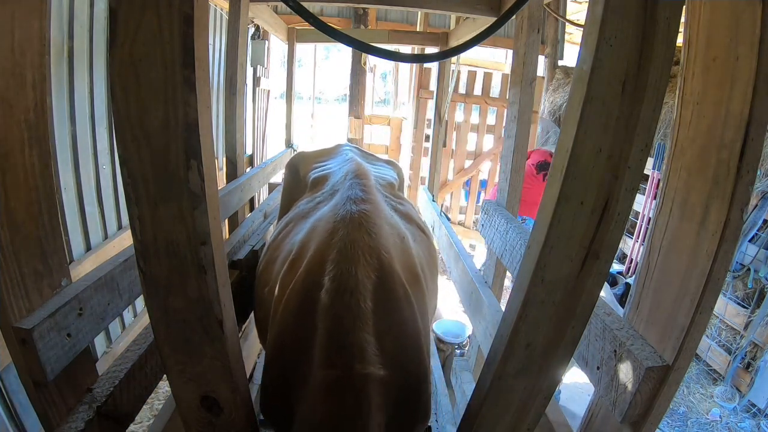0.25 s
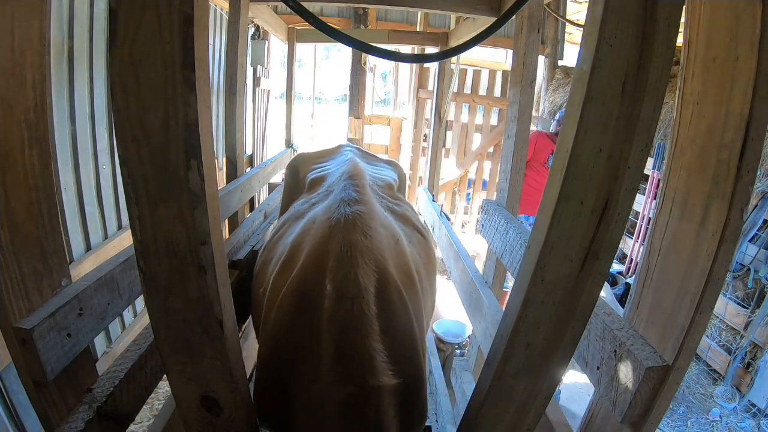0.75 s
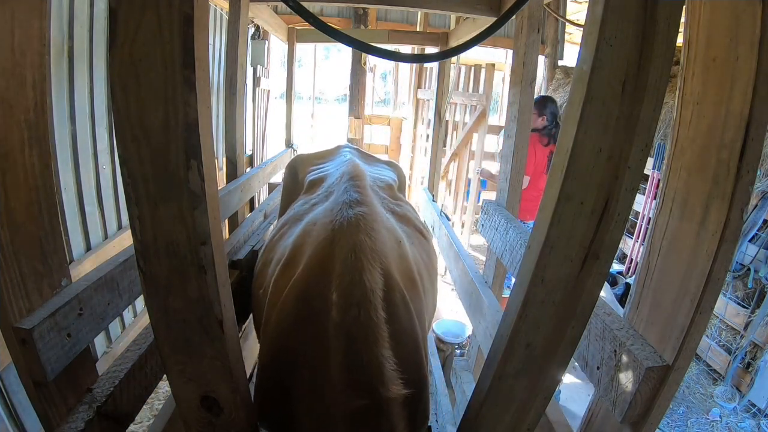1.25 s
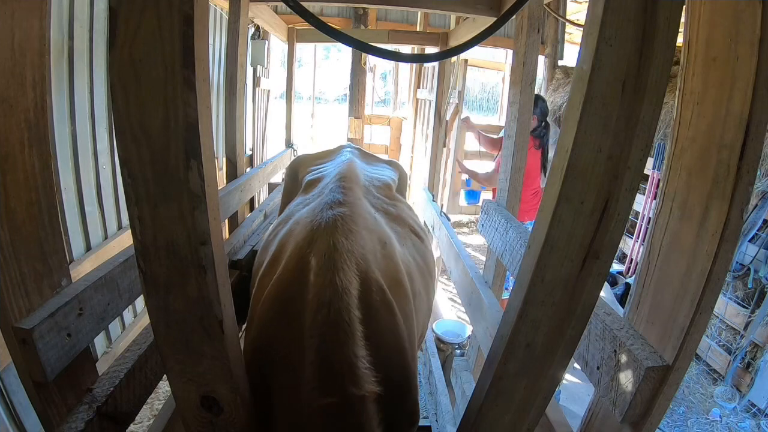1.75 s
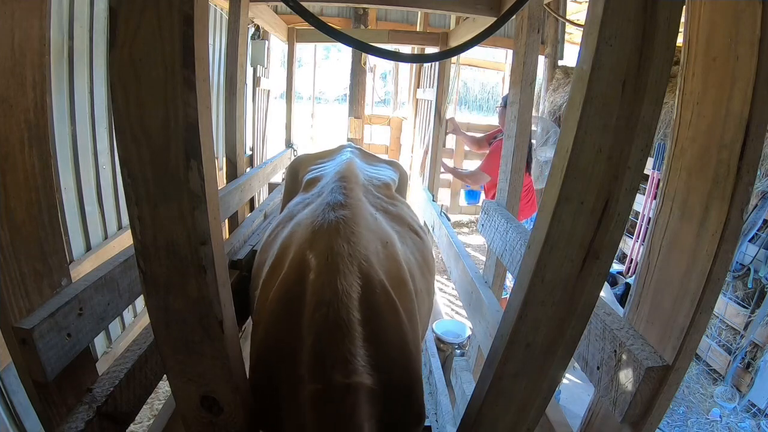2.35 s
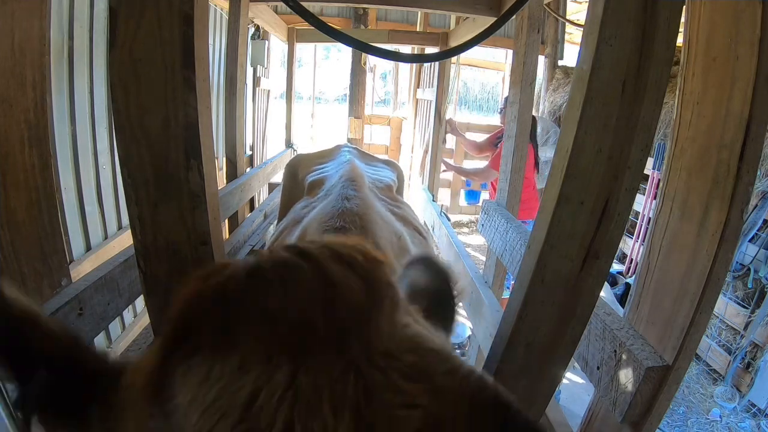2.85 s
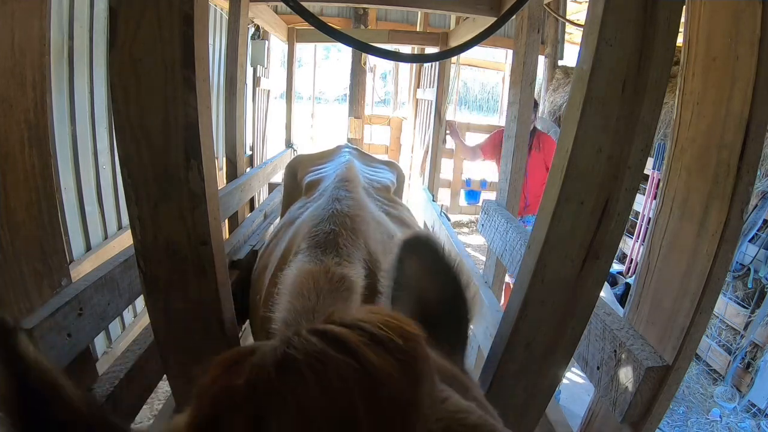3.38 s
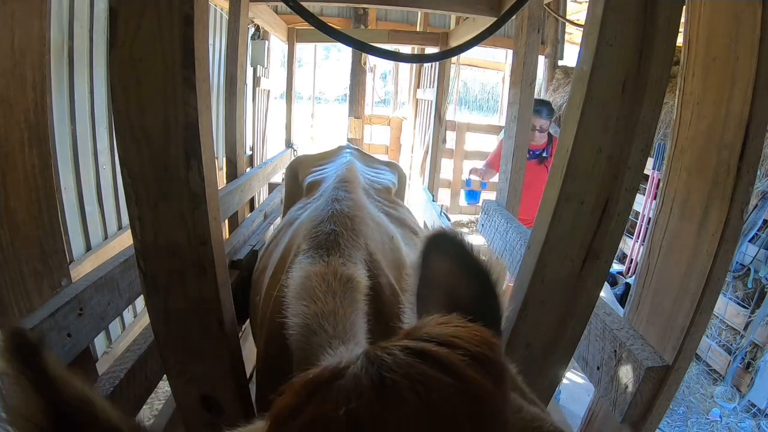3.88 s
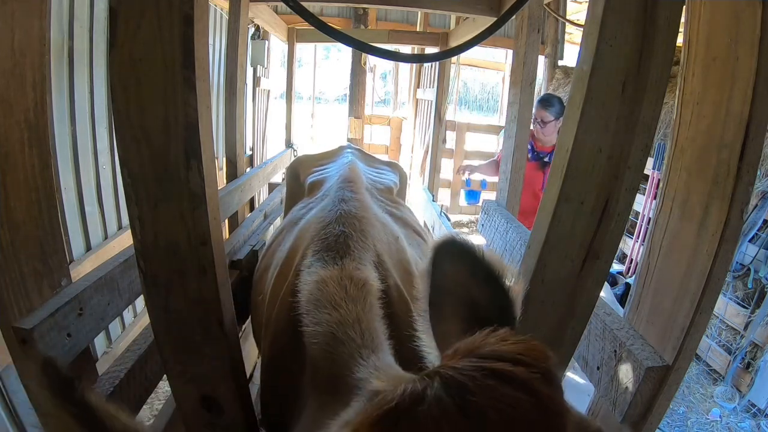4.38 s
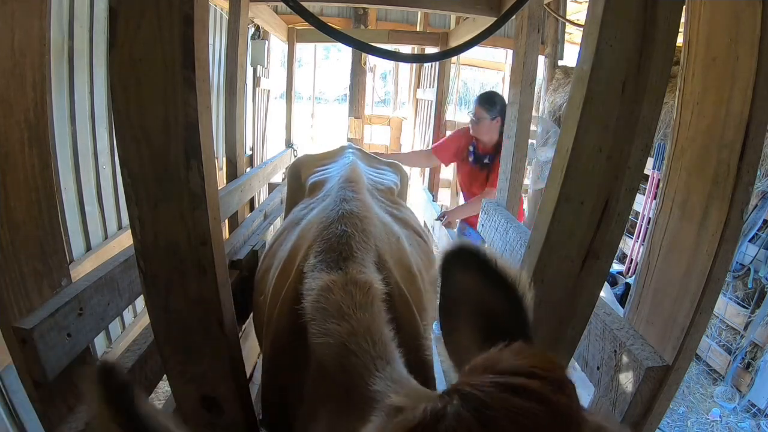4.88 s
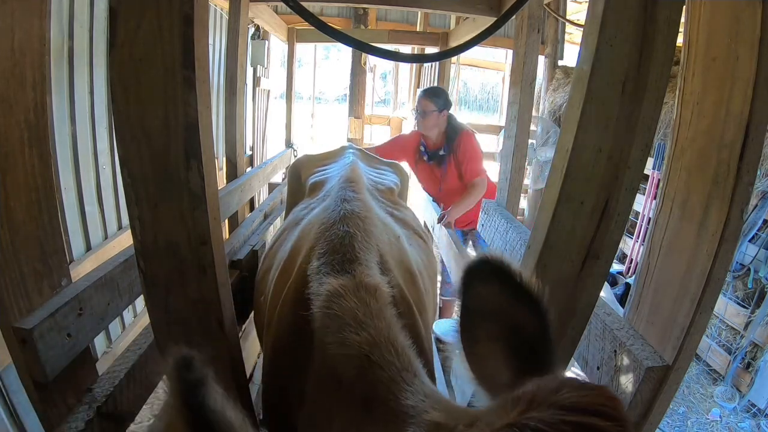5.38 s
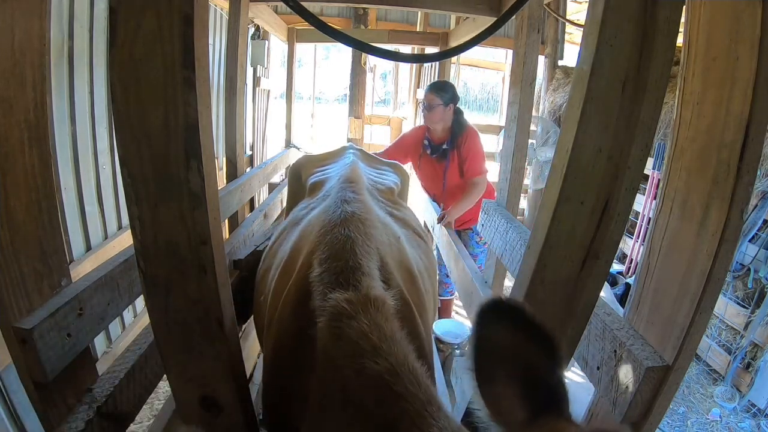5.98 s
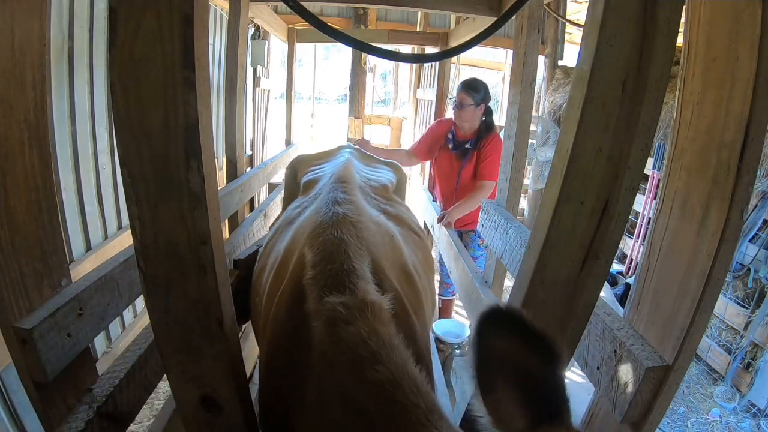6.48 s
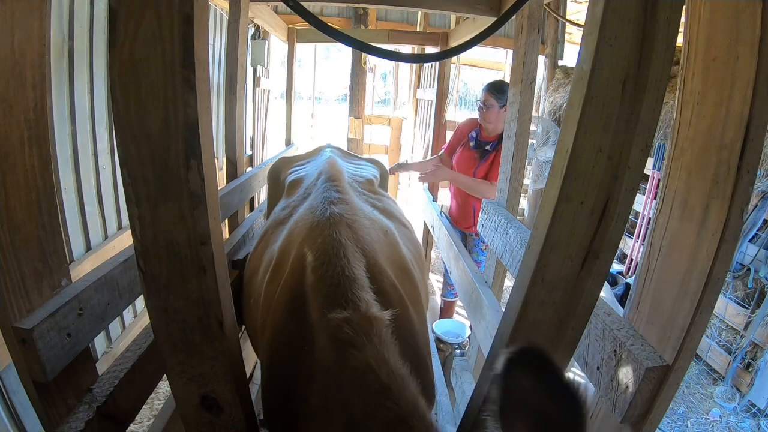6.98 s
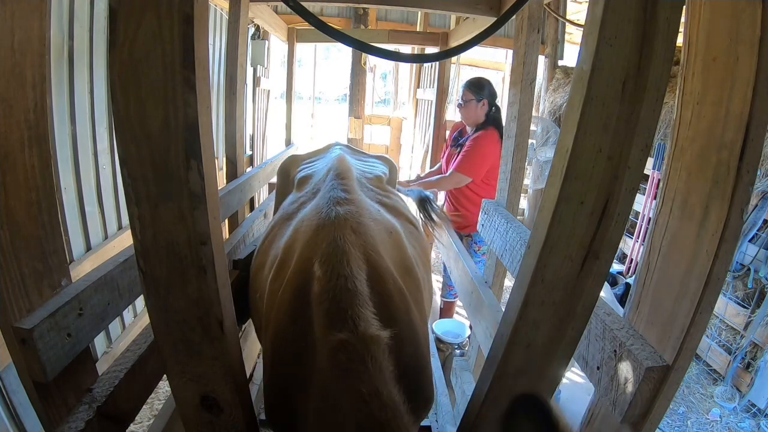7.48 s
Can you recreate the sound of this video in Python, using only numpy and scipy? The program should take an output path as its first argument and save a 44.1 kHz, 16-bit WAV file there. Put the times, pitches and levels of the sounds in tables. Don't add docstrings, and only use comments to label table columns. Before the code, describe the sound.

Stereo microphone fixed to the stall timber, so blows come through solid and bassy with a short bright scatter from open slats. First gate bang and latch, then soft hoof thuds and a quieter gap, then dry, sharp crunching and straw rustle up close. Later a heavy double hoof thump, a wooden bar stuttering through its slot, high chain jingles, a brief strap creak and a tap on the trough.

```python
import sys
import numpy as np
from scipy import signal
from scipy.fft import rfft, irfft
from scipy.io import wavfile
from scipy.ndimage import uniform_filter1d

SR = 44100
rng = np.random.default_rng(int(sys.argv[2]) if len(sys.argv) > 2 else 0)


def voltage_ratio(decibels):
    exponent = np.asarray(decibels, float) / 20
    return 10 ** exponent


def generate_wav(sig):
    pcm = np.round(np.clip(np.atleast_2d(sig).T, -1, 1) * 32767).astype(np.int16)
    wavfile.write(sys.argv[1], SR, pcm)


N = 341327
HIT = SR // 4

# pitch_hz, width_hz, level_db
BOARDS = [(107, 65, -13), (135, 40.8, 0), (155.5, 51.7, -1), (212.2, 47.7, -2), (268, 156, -7.5),
          (395, 310, -11.5)]
# pitch_hz, level_db, t60_s
POST_BODY = [(204.2, 10.5, 0.31), (416.7, 6.5, 0.19), (272, 5, 0.13)]
# freq_hz, level_db_per_hz
POST_GRAIN = [(180, -97), (300, -21), (414, -2.5), (660, -15.5), (1020, -3.5), (1400, -6), (3460, -17.5),
              (8780, -35.5), (14000, -61)]


def level(x, db):
    return x * voltage_ratio(db) / np.sqrt(np.mean(x ** 2))


def curves(table):
    s, *columns = np.transpose(table)
    return [np.interp(np.arange(N) / SR, s, c) for c in columns]


def band(x, lo_hz, hi_hz):
    edges_hz = [lo_hz, min(hi_hz, .45 * SR)]
    return signal.sosfilt(signal.butter(2, edges_hz, "band", fs=SR, output="sos"), x)


def ring(x, hz, t60):
    r = np.exp(-np.log(1000) / (t60 * SR))
    w = 2 * np.pi * hz / SR
    return signal.lfilter([np.sin(w)], [1, -2 * r * np.cos(w), r * r], x)


def resonances(x, peaks):
    out = 0
    for k, (hz, width_hz, db) in enumerate(peaks):
        t60 = np.log(1000) / (np.pi * width_hz)
        out = out + (-1) ** k * voltage_ratio(db) * width_hz * ring(x, hz, t60)
    return out


def colour(x, points):
    hz, db = np.transpose(points)
    log_hz = np.log(np.arange(1025) * SR / 2048 + 1)
    cep = irfft(np.interp(log_hz, np.log(hz), db) * np.log(10) / 20)
    cep[1:1024] = 2 * cep[1:1024]
    cep[1025:] = 0
    return signal.oaconvolve(x, irfft(np.exp(rfft(cep))))[:len(x)]


def grains(per_s, spread_db, size=N):
    hit, strength, sign = rng.random((3, size))
    return (hit < per_s / SR) * voltage_ratio(-spread_db * np.log(strength + .02)) * np.sign(sign - .5)


def walk(rate_hz):
    k = int(SR / rate_hz)
    steps = np.repeat(rng.standard_normal(N // k + 1), k)
    return 1.65 * uniform_filter1d(uniform_filter1d(steps, k), k)[:N]


def burst(t60, rise_s=0.00085, size=SR // 2):
    t = np.arange(size) / SR
    return rng.standard_normal(size) * (1 - np.exp(-t / rise_s)) * np.exp(-np.log(1000) * t / max(t60, .01))


def push(width_s):
    shove = np.hanning(int(width_s * SR) + 3)
    return np.pad(shove, (0, SR // 2 - len(shove)))


def spread(make, apart):
    return level(make() + apart * make() * np.array([[1], [-1]]), 0)


def add(out, s, wave, db, pan_db=0.):
    i = int(s * SR)
    wave = wave[..., :N - i]
    sides_db = np.array([[pan_db], [-pan_db]]) / 2
    out[:, i:i + wave.shape[-1]] += wave / np.abs(wave).max() * voltage_ratio(db + sides_db)


def gestures(table, rise_db_s, fall_db_s, rest_db):
    s, hold, *columns = np.transpose(table)[:, :, None]
    t = np.arange(0, N, 64) / SR
    shape_db = -rise_db_s * np.maximum(s - t, 0) - fall_db_s * np.maximum(t - s - hold, 0)
    out = []
    for c, rest in zip(columns, rest_db):
        db = np.maximum((c + shape_db).max(axis=0), rest)
        out.append(np.interp(np.arange(N) / SR, t, db))
    return out


def knocks(events, body, clack, grain, swell_s, strike_t60, contact_t60, grain_db, pan_db,
           rise_s=0.00097, twin=0.7):
    out = np.zeros((2, N))
    swell = 1 - np.exp(-np.arange(SR // 2) / SR / swell_s)
    for s, db, clack_db in events:
        low = sum(voltage_ratio(g) * ring(push(0.0012), hz, t60) for hz, g, t60 in body)
        add(out, s, band(swell * low, 150, 1200), db, pan_db)
        modes = 0
        for hz, g, t60 in clack:
            mode = ring(burst(strike_t60, rise_s), hz, t60)
            mode = mode + twin * ring(burst(strike_t60, rise_s), 1.04 * hz, t60)
            modes = modes + voltage_ratio(g) * level(mode, 0) * np.sqrt(t60)
        crushed = colour(burst(contact_t60, rise_s), grain)
        add(out, s, level(modes, 0) + level(crushed, grain_db), clack_db, pan_db)
    return out


def cracks(events):
    out = np.zeros((2, N))
    for s, db, hz, bright_db, t60 in events:
        crumble = voltage_ratio(25.0 * uniform_filter1d(rng.standard_normal(HIT), size=60))
        crunch = spread(lambda: burst(t60, rise_s=0.001, size=HIT), apart=0.71) * crumble
        contact = crunch / np.abs(crunch).max() + 0.45 * burst(.008, rise_s=0.00055, size=HIT)
        broad = band(band(contact, .55 * hz, 1.4 * hz), .4 * hz, 1.6 * hz)
        add(out, s, broad + .045 * ring(contact, hz, .007), db, -2.7)
        add(out, s, band(band(contact, 4600, 10000), 2000, 11500), bright_db, -2.1)
    return out


def air():
    # freq_hz, level_db_per_hz
    air_spectrum = [(18, -63), (30, -32.5), (181, 3), (373, -9), (458, -14.5), (1220, -19.5), (1880, -20.5),
                    (3230, -21.5), (8810, -43), (14000, -100)]
    mid, side = (band(colour(rng.standard_normal(N), air_spectrum), 45, 16000) for _ in range(2))
    return level(mid + 0.34 * side * np.array([[1], [-1]]), -52)


def insects():
    # pitch_hz, width_hz, level_db
    wing_bands = [(2500, 400, -2), (4670, 250, 1), (6800, 400, -2.5)]
    swell = np.exp(-((np.arange(N) / SR - 1.25) / 0.62) ** 2)
    return swell * level(resonances(rng.standard_normal((2, N)), wing_bands), -63.5)


def bird():
    # time_s, pitch_hz, level_db
    peep = [(1.155, 6730, -64), (1.17, 7500, -59), (1.19, 7900, -60), (1.215, 8160, -73),
            (1.235, 8300, -74)]
    hz, db = curves(peep)
    inside = np.abs(np.arange(N) / SR - 1.195) < .04
    level_now = voltage_ratio(db + 3.0 * walk(150))
    return inside * level_now * np.sin(2 * np.pi * np.cumsum(hz * (1 + .02 * walk(400))) / SR)


def shifting():
    # start_s, hold_s, sway_db, rub_db
    shifts = [(0.0, 0.013, -49, -37.5), (0.36, 0.21, -52, -40), (0.8, 0.2, -66, -41.5),
              (1.36, 0.36, -42, -42), (1.8, 0.43, -53, -45), (2.15, 0.21, -39.5, -44),
              (2.4, 0.18, -37.5, -51), (2.8, 0.14, -49.5, -67), (3.07, 0.35, -35, -40.5),
              (3.45, 0.34, -45, -43.5), (3.7, 0.28, -64, -46.5), (4.03, 0.023, -42, -53),
              (4.42, 0.059, -62, -36.5), (4.58, 0.22, -74, -42.5), (4.87, 0.1, -38, -52.5),
              (5.11, 0.022, -28, -48), (5.3, 0.17, -46, -55.5), (5.85, 0.29, -32.5, -29),
              (6.23, 0.11, -26, -29), (6.38, 0.039, -28, -26), (6.53, 0.096, -29.5, -54),
              (6.8, 0.3, -37, -44), (7.25, 0.016, -42, -46.5), (7.42, 0.099, -45, -68)]
    frame_db, boards_db = gestures(shifts, rise_db_s=270, fall_db_s=109, rest_db=(-65, -62))
    scuff_db = np.minimum(boards_db - 13, -43)
    frame = spread(lambda: band(rng.standard_normal(N), 30.4, 132), apart=0.64)
    frame = frame + level(ring(rng.standard_normal(N), 65.5, 0.19), 0.45)
    boards = spread(lambda: resonances(grains(600, spread_db=4), BOARDS), apart=0.31) * voltage_ratio(1.8 * walk(18))
    scuff = spread(lambda: band(grains(2500, spread_db=2.0), 228, 1010), apart=0.42) * voltage_ratio(2.5 * walk(25))
    sway = voltage_ratio(frame_db + 1.0 * np.array([[1], [-1]])) * level(frame, 0)
    return sway + voltage_ratio(boards_db) * level(boards, 0.19) + voltage_ratio(scuff_db) * level(scuff, 0.22)


def thuds():
    # start_s, peak_db, pitch_hz, t60_s
    hooves = [(1.352, -30, 142, 0.051), (1.414, -30, 190, 0.14), (1.467, -29, 167, 0.22),
              (1.55, -31, 163, 0.1), (1.624, -27.5, 164, 0.23), (2.088, -27.5, 169, 0.16),
              (2.217, -23.5, 175, 0.077), (2.262, -23.5, 141, 0.14), (2.321, -26, 155.5, 0.19),
              (3.981, -33, 152.7, 0.63), (4.836, -26.5, 148, 0.26), (5.076, -15.5, 147.5, 0.32),
              (5.125, -16, 135, 0.22), (6.786, -27.5, 210, 0.41), (6.9, -34.5, 373, 0.33),
              (7.06, -30.5, 205, 0.12), (7.255, -28.5, 104, 0.062), (7.626, -36, 171, 0.16)]
    out = np.zeros((2, N))
    swell = 1 - np.exp(-np.arange(SR // 2) / SR / 0.0028)
    for s, db, hz, t60 in hooves:
        modes = ring(push(0.0029), hz, t60) + 0.43 * ring(push(0.0037), 1.3 * hz, 0.59 * t60)
        add(out, s, band(swell * modes, 53, 470), db, 1.5)
    return out


def chain():
    # start_s, peak_db
    links = [(5.926, -38), (5.97, -60), (6.0544, -49), (6.19, -46), (6.232, -46), (6.298, -39),
             (6.371, -32), (6.4004, -46), (6.46, -42), (6.597, -28.5), (6.66, -40.5), (6.77, -60),
             (7.102, -32.5), (7.1585, -39), (7.212, -41), (7.29, -65), (7.374, -35.5), (7.44, -47),
             (7.6218, -53), (7.7215, -48)]
    # pitch_hz, level_db, t60_s
    link_modes = [(11250, -14, .15), (12620, -5, .2), (12740, 0, .3), (12860, -2, .2), (13180, -5, .3),
                  (13320, -9, .15), (13620, -6, .25)]
    out = np.zeros((2, N))
    fade = np.exp(-np.arange(SR // 2) / SR / 0.044)
    for s, db in links:
        tick = burst(0.0092, rise_s=0.000074)
        touches = tick + .5 * fade * spread(lambda: grains(900, spread_db=3.0, size=SR // 2), apart=.7)
        detune = 1 + .006 * rng.standard_normal(len(link_modes))
        jingle = 0
        for (hz, g, t60), k in zip(link_modes, detune):
            jingle = jingle + voltage_ratio(g + 3.9 * rng.standard_normal()) * ring(touches, hz * k, 0.41 * t60)
        add(out, s, jingle, db, -1.5)
        add(out, s, band(tick, 6300, 14000), db + 1.5)
    out = signal.sosfilt(signal.ellip(6, .5, 60, 13850, fs=SR, output="sos"), out)
    return np.array([np.roll(out[0], -1), out[1]])


def bar():
    # start_s, peak_db, ring_hz, thump_db, scrape_db
    slips = [(5.739, -23.5, 1110, -31.5, -31), (5.783, -33, 751, -31, -55), (5.832, -15.5, 705, -21, -36),
             (5.88, -17, 790, -36, -31), (5.935, -12.5, 700, -16.5, -30.5), (5.984, -15, 1000, -18.5, -28),
             (6.046, -33, 1000, -33, -33), (6.096, -19.5, 1140, -14, -23), (6.14, -10.5, 766, -17, -40),
             (6.191, -15.5, 766, -31, -57), (6.235, -11, 620, -20, -33), (6.292, -14, 1170, -20.5, -28),
             (6.315, -22, 1300, -33, -22.5), (6.357, -12.5, 1370, -16, -18.5),
             (6.397, -13.5, 1160, -13, -29.5), (6.419, -13, 780, -13.5, -45),
             (6.463, -13.5, 1310, -21, -26)]
    # pitch_hz, width_hz, level_db
    bar_modes = [(372, 29, 2), (524, 29, 8), (719, 33, 10), (1010, 43, -2), (1080, 81, 0), (1223, 77, 0.5),
                 (1370, 38, -4), (1510, 78, -6), (1890, 37, 1.5), (2460, 100, -21)]
    out = np.zeros((2, N))

    def slip():
        return burst(0.13, rise_s=0.0016, size=HIT) + 0.89 * burst(.035, rise_s=0.0019, size=HIT)

    for s, db, hz, thump_db, scrape_db in slips:
        contact = spread(slip, apart=0.38)
        grip_db = 1.5 * rng.standard_normal(len(bar_modes))
        gripped = [(f, w, g + d) for (f, w, g), d in zip(bar_modes, grip_db)]
        wood = level(resonances(contact, gripped), 0)
        wood = wood + level(band(band(contact, 0.54 * hz, 1.67 * hz), 470, 2040), -0.26)
        wood = wood + level(ring(contact, hz, 0.011), 1.0)
        add(out, s, wood, db, 2.0)
        add(out, s, band(band(contact, 1300, 3300), 1500, 12000), scrape_db, -.6)
        add(out, s, resonances(burst(0.19, rise_s=0.016), BOARDS), thump_db, 1.5)
    return out


def creaks():
    # start_s, peak_db, clack_db
    strap = [(7.224, -70, -32.5), (7.292, -72, -36)]
    # pitch_hz, level_db, t60_s
    strap_modes = [(2400, 0, 0.016), (2880, 0, 0.013), (3200, 3.5, 0.014)]
    return knocks(strap, POST_BODY, strap_modes, POST_GRAIN, swell_s=0.0035, strike_t60=0.27,
                  contact_t60=0.17, grain_db=-30, pan_db=0.0)


def taps():
    # start_s, peak_db, clack_db
    edge_taps = [(7.517, -53, -27.5)]
    # pitch_hz, level_db, t60_s
    edge_modes = [(1040, -5, 0.11), (1260, 2.5, 0.098), (1384, -5, 0.24), (2330, -6, 0.13), (2600, -6, .08),
                  (3200, -11, 0.048)]
    return knocks(edge_taps, POST_BODY, edge_modes, POST_GRAIN, swell_s=0.0038, strike_t60=0.027,
                  contact_t60=0.26, grain_db=-8, pan_db=0.0)


def bucket():
    # start_s, peak_db, clack_db
    bumps = [(4.4015, -30.5, -16), (4.411, -55, -20)]
    # pitch_hz, level_db, t60_s
    bucket_modes = [(797, -8.5, 0.21), (1100, -9, 0.11), (1343, 0.5, 0.064), (1602, -9, 0.3),
                    (1980, -3.5, 0.2), (2200, 0.5, .08), (2770, -1.5, 0.076), (3420, -1, 0.04)]
    return knocks(bumps, POST_BODY, bucket_modes, POST_GRAIN, swell_s=0.018, strike_t60=0.023,
                  contact_t60=0.32, grain_db=-8.5, pan_db=-4.0, rise_s=0.00038, twin=0.33)


def latch():
    # start_s, peak_db, clack_db
    strikes = [(0.7355, -18, -11)]
    drops = [(0.886, -28.5, -27), (0.95, -57, -37.5)]
    # pitch_hz, level_db, t60_s
    strike_modes = [(974, 3, 0.12), (1014, -11, 0.22), (1170, -12, 0.095), (1405, -2, 0.16),
                    (1470, -10, 0.089), (1817, -20, 0.15), (1960, -10, 0.14), (2280, 3, 0.041),
                    (2600, -17, .08), (2760, -3, 0.14), (3400, -11, 0.074)]
    drop_modes = [(630, -9, 0.32), (800, -4, 0.14), (1000, -0.5, 0.24), (1337, -1, 0.15), (1540, -11, 0.12),
                  (2200, -9, 0.09), (3200, -3.5, 0.05)]
    out = knocks(strikes, POST_BODY, strike_modes, POST_GRAIN, swell_s=0.021, strike_t60=.05,
                 contact_t60=0.3, grain_db=3, pan_db=-2.5, rise_s=.0003)
    return out + knocks(drops, POST_BODY, drop_modes, POST_GRAIN, swell_s=0.017, strike_t60=0.1,
                        contact_t60=0.41, grain_db=-1.5, pan_db=-2.5)


def gate():
    # start_s, peak_db, clack_db
    blows = [(0.3455, -5, -12)]
    shuts = [(0.395, -9, -14.5), (0.419, -43, -24)]
    rebounds = [(0.461, -27.5, -14.5)]
    # pitch_hz, level_db, t60_s
    gate_body = [(149.2, 6.5, 0.38), (209, -3.5, 0.25), (297.5, -10, 0.15), (347.5, -11, 0.36)]
    blow_modes = [(540, -20, 0.15), (790, -8, 0.14), (875, -9, 0.12), (990, 6, 0.065), (1195, -9, 0.11),
                  (1707, -6, 0.077), (2200, -25, .08)]
    shut_modes = [(832, -4, .15), (1000, -2, 0.13), (1233, -10, .15), (1430, -4, 0.17), (1720, -4, .09),
                  (2099, -3, 0.063), (2210, -16, .12)]
    rebound_modes = [(765, -12, 0.14), (916, 2.5, 0.11), (1014, -11, .2), (1390, -8.5, 0.2),
                     (1446, -3.5, 0.19), (1570, -0.5, 0.051), (1800, -21, 0.13), (2200, -6, 0.11)]
    # freq_hz, level_db_per_hz
    gate_grain = [(150, -50), (250, -11.5), (357, -17), (671, -34), (944, -16), (1750, -20), (7380, -57),
                  (12000, -92), (15600, -70), (22000, -120)]
    out = knocks(blows, gate_body, blow_modes, gate_grain, swell_s=0.0077, strike_t60=0.031,
                 contact_t60=0.59, grain_db=-4.5, pan_db=-0.5, rise_s=0.0036, twin=0.62)
    out = out + knocks(shuts, gate_body, shut_modes, gate_grain, swell_s=0.0044, strike_t60=0.019,
                       contact_t60=0.15, grain_db=1, pan_db=0.7, rise_s=.003, twin=.25)
    return out + knocks(rebounds, gate_body, rebound_modes, gate_grain, swell_s=0.0016, strike_t60=0.018,
                        contact_t60=0.24, grain_db=-5.5, pan_db=-2.0, rise_s=0.0024, twin=0.33)


def snaps():
    # start_s, peak_db, ring_hz, bright_db, t60_s
    snap_events = [(1.515, -28, 1300, -31, 0.027), (2.0807, -36.5, 2130, -66, 0.14),
                   (2.2622, -39, 1240, -54, 0.027), (2.4004, -41.5, 1890, -72, 0.19),
                   (2.5643, -23.5, 2940, -34.5, 0.2), (2.8983, -40, 2500, -38, 0.05),
                   (4.401, -25, 2070, -42, 0.18), (5.562, -32.5, 2600, -40, 0.074),
                   (5.5755, -29, 3660, -27.5, 0.054), (5.659, -28, 2400, -37, 0.2),
                   (5.715, -24.5, 1290, -30.5, 0.015), (6.053, -42, 4400, -25.5, 0.2),
                   (6.5968, -33, 3430, -29.5, 0.42), (6.695, -32.5, 2600, -34, 0.34),
                   (6.765, -27, 1370, -33, 0.17), (6.7785, -31.5, 486, -88, 0.18),
                   (6.893, -40.5, 1100, -58, 0.67), (7.0889, -30, 4640, -34, 0.35),
                   (7.225, -38, 1540, -53, 0.31), (0.466, -57, 3000, -36.5, 0.031),
                   (7.372, -60, 3000, -37, 0.3), (2.5653, -28.5, 1300, -53, 0.15),
                   (4.418, -23.5, 800, -50, 0.33), (2.345, -38, 750, -66, 0.071),
                   (5.60, -38, 1300, -60, 0.069), (1.352, -38, 1100, -70, .04),
                   (1.40, -33.5, 690, -64, 0.61), (6.5927, -49, 3000, -56, 0.025),
                   (7.495, -44, 2500, -45, .04), (2.834, -42, 770, -70, 0.17),
                   (7.622, -52, 2380, -42, 0.35), (7.72, -47, 2940, -40, 0.1)]
    return cracks(snap_events)


def stalks():
    # start_s, peak_db
    clicks = [(3.0181, -41), (3.2041, -36), (3.4491, -34), (3.6047, -34), (3.6461, -37), (3.8307, -41),
              (3.899, -30), (4.6429, -35), (5.332, -32), (5.5757, -43), (5.8337, -56), (5.9265, -47),
              (6.0542, -46), (6.594, -31), (7.1033, -42), (7.3737, -46), (7.6211, -46), (7.7219, -48)]
    out = np.zeros((2, N))
    for s, db in clicks:
        click = spread(lambda: burst(.012, rise_s=.0001, size=HIT), apart=.6)
        add(out, s, band(click, 10500, 17000), db + 5, -1.5)
    return out


def rustle():
    # start_s, hold_s, rustle_db, bright_db
    flurries = [(0.0, 0.053, -51.5, -54.5), (0.25, 0.14, -49, -52.5), (0.38, 0.042, -43, -47.5),
                (0.52, 0.025, -66, -73), (0.89, 0.14, -56.5, -66), (1.1, 0.38, -56.5, -67.5),
                (1.38, 0.18, -49.5, -59.5), (1.55, 0.15, -55, -58), (1.9, 0.41, -54, -56.5),
                (2.9, 0.13, -57.5, -55.5), (3.065, 0.0038, -27.5, -32), (3.22, 0.0071, -24.5, -25.5),
                (3.358, 0.0074, -29, -35.5), (3.42, 0.06, -33, -51), (3.55, 0.14, -35, -38),
                (3.7, 0.13, -36.5, -40), (3.82, 0.12, -36.5, -39), (4.0, 0.15, -47.5, -45.5),
                (4.2, 0.16, -46.5, -48.5), (4.42, 0.245, -37.5, -37.5), (4.58, 0.26, -43, -44.5),
                (4.85, 0.52, -47, -46), (5.4, 0.36, -51, -51), (5.58, 1, -49, -52.5),
                (5.95, 0.54, -41, -45.5), (6.58, 0.25, -51.5, -50.5), (6.9, 0.19, -46.5, -47.5),
                (7.15, 0.15, -54, -48), (7.45, 0.05, -55, -57)]
    # freq_hz, level_db_per_hz
    feed_spectrum = [(290, -25), (500, 6), (560, 13), (610, 6), (694, 12), (834, 7.5), (2160, 7),
                     (3510, 11.5), (5010, -7.5), (9370, -16), (15000, -40)]
    db, bright_db = gestures(flurries, rise_db_s=389, fall_db_s=143, rest_db=(-74, -74.5))
    crumbs = spread(lambda: grains(8000, spread_db=3.0), apart=.7) * voltage_ratio(.8 * walk(25) + 3 * walk(110))
    crackle = level(grains(200, spread_db=0.5), -8.0)
    crumbs = np.array([colour(side + crackle, feed_spectrum) for side in crumbs])
    sound = voltage_ratio(db) * level(band(crumbs, 763, 9450), 1.0)
    sound = sound + voltage_ratio(bright_db) * level(band(crumbs, 5900, 16700), 0.11)
    return sound * voltage_ratio(np.array([[-1.2], [1.2]]))


def feeding():
    # start_s, peak_db, ring_hz, bright_db, t60_s
    bites = [(3.024, -21.5, 3200, -27, 0.084), (3.04, -19, 3230, -22.5, 0.057),
             (3.066, -25.5, 2500, -27.5, 0.54), (3.132, -16.5, 3400, -25, 0.041),
             (3.1654, -23.5, 3400, -33, 0.19), (3.2022, -19.5, 2430, -16, 0.065),
             (3.22, -19, 2240, -29, 0.11), (3.243, -25, 2400, -36, 0.24), (3.346, -12.5, 2500, -28, 0.11),
             (3.4224, -24, 3300, -26.5, 0.1), (3.455, -19.5, 3030, -36, 0.1),
             (3.504, -23.5, 2500, -31, 0.23), (3.547, -24.5, 3260, -26, 0.14),
             (3.6048, -17.5, 3100, -17.5, 0.086), (3.6459, -17.5, 3050, -21.5, 0.084),
             (3.659, -17.5, 2200, -43, 0.08), (3.7418, -24, 3200, -47, 0.059),
             (3.804, -27, 2830, -33, 0.085), (3.831, -32, 1900, -26, 0.071),
             (3.8426, -17.5, 2950, -20, 0.15), (3.896, -17, 3520, -17, 0.14),
             (3.919, -19, 3200, -34, 0.071), (4.4728, -24, 3300, -26.5, 0.049),
             (4.642, -16.5, 2400, -21, 0.094), (4.7716, -28.5, 3200, -32.5, 0.25),
             (4.828, -26.5, 2720, -33, 0.26), (4.9575, -29, 2905, -50, 0.11),
             (5.261, -29.5, 1660, -28.5, 0.05), (5.2877, -32, 2630, -25, 0.046),
             (5.3293, -26.5, 2270, -21, 0.09)]
    # start_s, peak_db, ring_hz, bright_db
    kernels = [(3.0185, -10, 3130, -26), (3.29, -13, 3220, -41), (3.309, -15.5, 3000, -18.5),
               (3.3198, -16, 2900, -18), (3.449, -7, 2900, -13), (4.043, -25.5, 2860, -36),
               (4.612, -18.5, 3340, -24)]
    scratches = [(2.982, -31.5, 3400, -38), (3.9560, -45, 3000, -38), (4.1207, -32, 1710, -38),
                 (4.166, -37, 3040, -33.5), (4.1899, -29.5, 3200, -37), (4.232, -28.5, 2960, -31.5),
                 (4.2692, -36.5, 1980, -38), (4.3266, -36, 3320, -33.5), (4.386, -27, 2500, -32.5),
                 (4.55, -41, 2710, -35), (4.7274, -27.5, 2700, -32), (5.001, -32, 2840, -34),
                 (5.1, -40, 1570, -48), (5.142, -31.5, 2280, -35), (5.212, -32.5, 3400, -33),
                 (5.4214, -47, 3230, -43), (5.488, -44, 1990, -49), (5.831, -46, 3020, -45),
                 (5.958, -33, 4000, -29.5), (6.1884, -51, 4000, -46), (6.0335, -50, 4000, -38),
                 (6.372, -45, 4000, -24)]
    kernel_t60_s, scratch_t60_s = 0.021, 0.09
    split = [(*k, kernel_t60_s) for k in kernels]
    scratched = [(*k, scratch_t60_s) for k in scratches]
    return cracks(bites + split + scratched)


def stall(x, t60, wet_db):
    t = np.arange(SR // 3) / SR
    tails = band(rng.standard_normal((2, len(t))), 368, 9700)
    tails = tails * np.exp(-np.log(1000) * t / t60) * (t > .001)
    tails = tails / np.sqrt(np.sum(tails ** 2, axis=1, keepdims=True))
    return x + voltage_ratio(wet_db) * signal.oaconvolve(x, tails, axes=1)[:, :N]


def scene():
    sound = insects() + bird() + shifting() + thuds() + chain() + bar()
    sound = sound + creaks() + taps() + bucket() + latch() + gate()
    sound = sound + snaps() + stalks() + rustle() + feeding()
    return stall(sound, t60=0.18, wet_db=-9.0) + air()


def band_limit(x):
    return signal.sosfilt(signal.butter(12, 15130, fs=SR, output="sos"), x)


def record(dry):
    ports = np.array([np.roll(dry[0], 1), dry[1]])
    ports = signal.sosfilt(signal.butter(6, 14400, fs=SR, output="sos"), ports)
    return band_limit(ports)


dry = scene()
out = record(dry)
generate_wav(out)
```